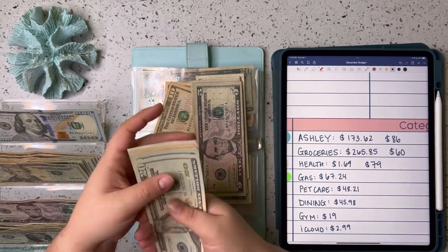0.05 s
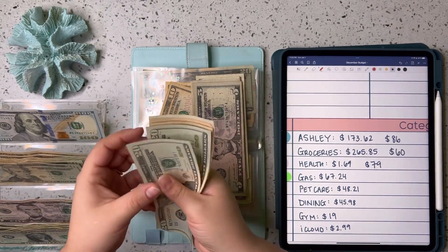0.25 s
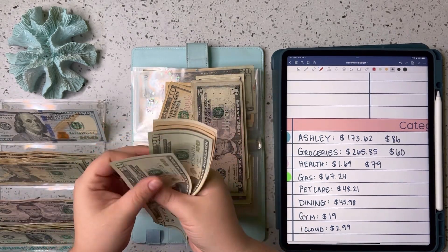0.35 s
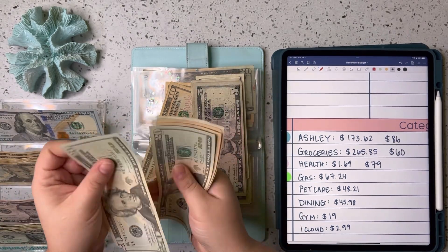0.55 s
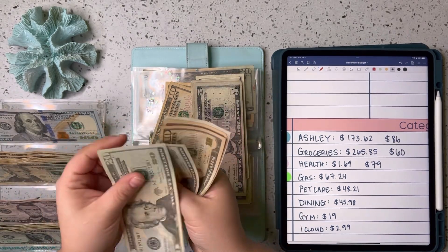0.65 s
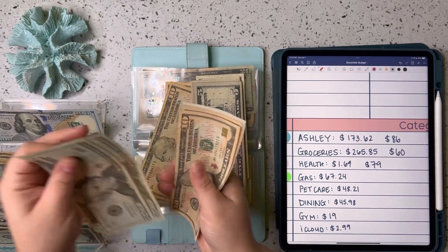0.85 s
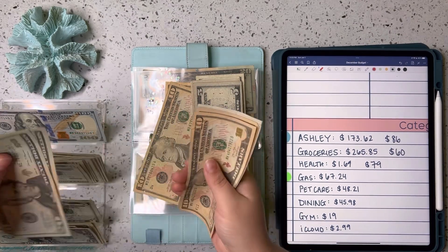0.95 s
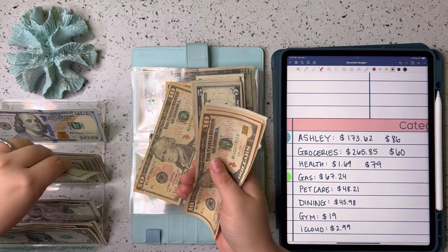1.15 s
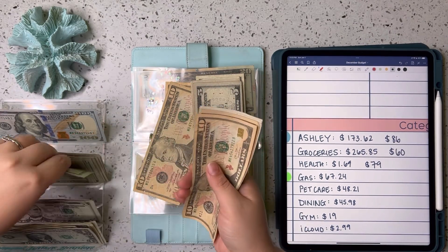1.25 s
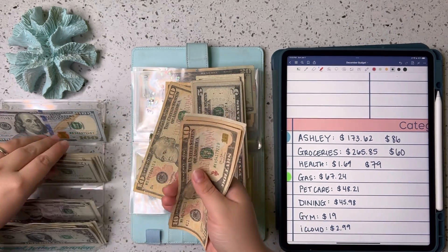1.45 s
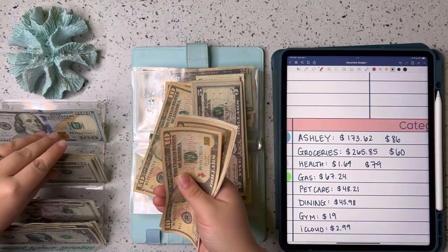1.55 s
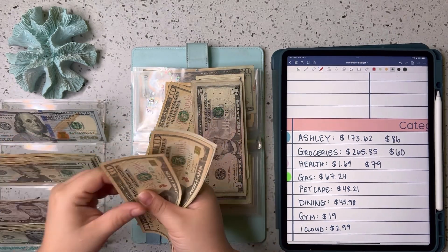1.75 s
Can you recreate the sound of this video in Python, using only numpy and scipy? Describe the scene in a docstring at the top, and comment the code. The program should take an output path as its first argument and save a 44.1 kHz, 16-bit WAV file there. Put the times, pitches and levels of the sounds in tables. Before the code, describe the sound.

Banknotes are counted by hand close to a phone microphone: grainy sliding, a sharp snap early, busy rustling, a louder flick before one second, then near silence and a soft rustle at the end.

```python
"""Paper notes are thumbed apart, flicked and laid down on a desk under a two-port phone microphone.
From the start paper slides on paper as a grainy hiss, made of noise and tiny clicks that ring in the sheets.
Flexing sheets and hands puff low air with small crumples, over a faint steady noise floor.
Creases soon snap as short ringing bursts, loudest near 0.23 s and 0.79 s, and a quiet room rings on.
From 0.38 s bending sheets also pop in short low tones; after 1 s it calms, then stirs again at the end."""
import sys
import numpy as np
from scipy import signal
from scipy.fft import rfft, irfft
from scipy.io import wavfile
from scipy.ndimage import uniform_filter1d

SR = 44100
rng = np.random.default_rng(int(sys.argv[2]) if len(sys.argv) > 2 else 0)


def invert_db(x):
    """Field ratio 10**(x/20) for x, a level in decibels (scalar or array-like)."""
    u = np.asarray(x, float) / 20
    return 10 ** u


def wav_out(sig):
    """Save sig, one row per channel (or a flat mono array), as 16-bit PCM at SR to the path in sys.argv[1]."""
    wavfile.write(sys.argv[1], SR, np.round(np.clip(np.atleast_2d(sig).T, -1, 1) * 32767).astype(np.int16))


N = 79380
HZ = np.fft.rfftfreq(N, 1 / SR) + 1  # kept above zero so that its logarithm exists

# how strongly sheets and hands flap: t/s, level from 160 to 1100 Hz/dB, bass above that level/dB
FLAP_CURVE = [(0, -57.5, -4.5), (0.1, -66.5, -6.5), (0.212, -82, 7), (0.235, -58, -12), (0.3, -71.5, 2),
              (0.4, -58.5, -17), (0.46, -52, -11.5), (0.5, -47, -13.5), (0.55, -55, -3.5),
              (0.6, -61.5, -14.5), (0.7, -59.5, -10), (0.75, -52.5, -17), (0.82, -50.5, -7),
              (0.86, -61, -12), (0.91, -54.5, -4), (0.96, -62.5, -12), (1.08, -80, -3), (1.18, -86.5, 6),
              (1.3, -89.5, 5.5), (1.7, -85.5, 4), (1.8, -68, -14)]
# tone colour of paper over the desk: f/Hz, level/dB
PAPER_COLOUR = [(700, -14), (1000, -3), (1400, -1.5), (2100, -4), (2900, 2.5), (4600, 1), (5900, -3),
                (7000, -0.5), (7600, -6), (9000, -3), (10300, -6), (12000, -2), (13600, -4), (15700, -10.5)]


def rms_one(x):
    """Scale each row to an average strength (rms) of 1."""
    return x / np.sqrt(np.mean(x ** 2, axis=-1, keepdims=True) + 1e-20)


def in_time(rows):
    """Read the columns of a time table at every sample, with straight lines between its rows."""
    s, *columns = np.transpose(rows)
    return [np.interp(np.arange(N) / SR, s, c) for c in columns]


def at_hz(points, hz):
    """Read a frequency table on a logarithmic pitch axis."""
    table_hz, values = np.transpose(points)
    return np.interp(np.log(hz), np.log(table_hz), values)


def drift(rate):
    """Random wandering of spread 1: noise smoothed twice so that little stays above rate (Hz)."""
    r = np.exp(-2 * np.pi * rate / SR)
    smooth = signal.lfilter([1], [1, -2 * r, r * r], rng.standard_normal(N + 8000))
    return rms_one(smooth[8000:])


def band(x, low, high):
    """Keep only the frequencies from low to high (Hz)."""
    return signal.sosfilt(signal.butter(3, [low, high], "band", fs=SR, output="sos"), x)


def colour(x, spectrum):
    """Raise and lower frequencies as a spectrum table says."""
    return irfft(rfft(x) * invert_db(at_hz(spectrum, HZ)), N)


def ring(x, hz, width):
    """A resonance at hz, width Hz wide: the narrower it is, the longer it rings."""
    r = np.exp(-np.pi * width / SR)
    return signal.lfilter([1, 0, -1], [1, -2 * r * np.cos(2 * np.pi * hz / SR), r * r], x)


def rub():
    """Fibres catch in dense small clicks over smooth friction noise; three ranges flicker and follow their levels."""
    # sliding paper: t/s, level from 3 to 8 kHz/dB, 0.7 to 3 kHz above that/dB, treble above that/dB
    rub_curve = [(0, -51.5, -5, -9), (0.1, -57.5, -0.5, -4), (0.16, -60, -3, -7.5), (0.195, -68.5, 2, -5),
                 (0.216, -57.5, 1, -9), (0.235, -35.5, -11, 2), (0.28, -42, -8, -9),
                 (0.34, -51.5, -6, -1.5), (0.39, -47.5, -0.5, -2.5), (0.415, -36.5, -6, -5),
                 (0.445, -36, -10.5, -6), (0.48, -51, 4.5, -9.5), (0.535, -49, -6.5, -3.5),
                 (0.565, -56.5, -2.5, -3.5), (0.62, -39, -16.5, -3.5), (0.67, -48, -6, -4.5),
                 (0.7, -45, -7.5, -10.5), (0.74, -54, 1, -6), (0.788, -42, -6.5, -7.5),
                 (0.808, -29, -18, -12.5), (0.83, -39.5, -6.5, -12.5), (0.88, -49, -4, -11.5),
                 (0.97, -54, -9.5, -4.5), (1.05, -64, -9, -5), (1.18, -74.5, -0.5, -6.5),
                 (1.235, -79.5, -0.5, -3.5), (1.258, -62.5, -7.5, -7), (1.34, -59, -8.5, -1),
                 (1.455, -70, 2, -5), (1.47, -65.5, -4, 3), (1.53, -59, -13.5, -7), (1.65, -50, -12.5, -9),
                 (1.8, -55.5, -7, -5.5)]
    grains_per_s, grain_spread_db, grain_db, flicker_db = 3100, 5, -7, 2
    level, low_db, treble_db = in_time(rub_curve)
    sizes = invert_db(grain_spread_db * np.minimum(rng.exponential(1, N), 5))
    caught = rng.random(N) < grains_per_s * invert_db(4 * drift(30)) / SR
    grains = rms_one(uniform_filter1d(sizes * caught, size=9))
    friction = rng.standard_normal((2, N)) * np.sqrt(1 + (invert_db(grain_db) * grains) ** 2)
    noise = sheet(colour(friction, PAPER_COLOUR))
    shared = drift(16.7)  # flicker common to all three ranges
    total = 0
    for low, high, db in [(700, 3000, low_db), (3000, 8000, 0), (8000, 16500, treble_db)]:
        flicker = flicker_db * (0.79 * shared + 0.61 * drift(65))
        total = total + invert_db(level + db + flicker) * rms_one(band(noise, low, high))
    return total


def sheet(x):
    """The sheets ring in narrow bands that swell and fade as they bend."""
    # ringing of the sheets: f/Hz, level/dB
    sheet_rings = [(1370, 2), (1720, 2), (2065, 10.5), (4450, -1), (5060, 2.5), (5850, 9.5)]
    width_hz, ring_db, sway_db = 122, -5.5, 3.5
    rung = sum(invert_db(db + sway_db * drift(11.0)) * ring(x, hz, width_hz) for hz, db in sheet_rings)
    return rms_one(x) + invert_db(ring_db) * rms_one(rung)


def flap():
    """Lumpy low noise from sheets flexing and hands moving."""
    # tone colour of the flapping: f/Hz, level/dB
    flap_colour = [(30, -23), (50, -5), (100, -2), (160, -5), (300, 1), (480, 3.5), (700, -2), (1000, -6)]
    flicker_db = 2.5
    level, bass_db = in_time(FLAP_CURVE)
    noise = colour(rng.standard_normal((2, N)), flap_colour)
    flexing = invert_db(level + flicker_db * drift(30)) * rms_one(band(noise, 160, 1100))
    bass = invert_db(level + bass_db + flicker_db * drift(10)) * rms_one(band(noise, 25, 160))
    return flexing + bass


def ticks():
    """Scattered small crumples, each a short ring between 700 and 3200 Hz, rise and fall with the flapping."""
    ticks_per_s, tick_db, spread_db = 200, -4.5, 6
    level, _ = in_time(FLAP_CURVE)
    sizes = invert_db(spread_db * np.minimum(rng.exponential(1, N), 3))
    clicks = (rng.random(N) < ticks_per_s / SR) * sizes
    # each click is dealt at random to one of six overlapping bands
    dealt, edges = rng.integers(0, 6, N), np.geomspace(700, 3200, 8)
    rung = sum(band(clicks * (dealt == k) + 1e-18, edges[k], edges[k + 2]) for k in range(6))
    return invert_db(level + tick_db) * rms_one(rung)


def noise_floor():
    """Faint steady noise, separate in the two views."""
    # tone colour of the floor: f/Hz, level/dB
    floor_colour = [(30, -23), (60, -2), (150, -11), (400, -20), (1200, -1), (15500, -39)]
    return invert_db(-83.5) * rms_one(colour(rng.standard_normal((2, N)), floor_colour))


def snaps():
    """Each crease bursts in crackle, part broad, part ringing, with a low push; the desk throws the crackle back."""
    # snapping creases: t/s, strength/dB, ring f/Hz, length/s, top of the crackle f/Hz
    snap_list = [(0.0153, -33, 2300, 0.0039, 3400), (0.067, -35.5, 1960, 0.0018, 2900),
                 (0.08, -37.5, 2100, 0.0018, 2970), (0.139, -35.5, 3000, 0.0027, 8000),
                 (0.2062, -37.5, 2230, 0.001, 5000), (0.2202, -19.5, 2090, 0.0017, 13970),
                 (0.2223, -28.5, 2340, 0.0059, 14360), (0.2283, -14.5, 5470, 0.0023, 14900),
                 (0.257, -27, 4900, 0.0023, 8160), (0.3685, -26.5, 1800, 0.0018, 5380),
                 (0.395, -29, 1500, 0.00083, 3000), (0.411, -24.5, 2200, 0.00146, 7040),
                 (0.442, -30.5, 4360, 0.0046, 7000), (0.466, -32, 2650, 0.0026, 3430),
                 (0.468, -31, 2185, 0.0021, 3200), (0.498, -40, 1200, 0.0015, 3000),
                 (0.54, -37.5, 1930, 0.0036, 3010), (0.794, -9, 1920, 0.0024, 14220),
                 (0.802, -25.5, 4340, 0.0026, 5200), (0.912, -39, 1946, 0.0047, 3500),
                 (1.3722, -41.5, 1390, 0.0046, 5530), (1.4118, -44.5, 1500, 0.0053, 5200),
                 (1.465, -52, 1410, 0.0057, 8000), (1.7257, -26.5, 3960, 0.0015, 6160),
                 (1.781, -46, 2400, 0.0074, 4500), (0.948, -47, 2000, 0.004, 6500)]
    ring_width_hz, broad_db, low_hz = 360, 1, 850
    tail_db, body_db = -17.5, -17.5  # after-crackle; low push of the sheet
    echo_s, echo_db = 0.0005, -6
    out, t = np.zeros((2, N + 2048)), np.arange(2048) / SR
    for s, db, hz, length, top_hz in snap_list:
        u = t / max(length, 5e-4)
        swell = np.sqrt(u) * (np.exp(-u ** 2) + invert_db(tail_db) * np.exp(-u / 2))
        burst = rng.standard_normal((2, 2048)) * swell
        broad = rms_one(band(burst, low_hz, min(top_hz, 0.45 * SR)))
        both = rms_one(ring(burst, hz, ring_width_hz)) + invert_db(broad_db) * broad
        # a longer snap gets more energy, so that its strength stays alike
        scale = np.sqrt(length * SR / 2048) / 2
        i = int(s * SR)
        out[:, i:i + 2048] += invert_db(db) * both / np.std(both, 1, keepdims=True) * scale
    echo = invert_db(echo_db) * np.roll(out, int(echo_s * SR), axis=1)
    # keeping only the upward swings leaves a slow bulge: the push of the sheet
    body = band(np.abs(out) + out, 350, 1500)
    return colour((out + echo)[:, :N], PAPER_COLOUR) + invert_db(body_db) * body[:, :N]


def room(x):
    """Dense reflections, built octave by octave from fading noise, die faster in the treble."""
    # time to fade by 60 dB: f/Hz, time/s
    fade_times = [(500, 0.39), (14000, 0.31)]
    room_db = -21
    t, tail = np.arange(SR) / SR, 0
    for low in 100 * 2.0 ** np.arange(8):
        octave = band(rng.standard_normal((2, SR)), low, min(2 * low, 17000))
        tail = tail + octave * invert_db(-60 * t / at_hz(fade_times, low))
    tail = tail * np.clip(t / 0.0018 - 1, 0, 1)  # silent for 1.8 ms, full at 3.6 ms
    tail = tail / np.sqrt(np.sum(tail ** 2) / 2)
    return invert_db(room_db) * signal.fftconvolve(x, tail, axes=1)[:, :N]


def pops():
    """A sheet pops as it bends over: a few cycles of low tone, swelling and dying."""
    # popping sheets: t/s, level (4 dB above the peak)/dB, f/Hz
    pop_list = [(0.383, -42, 440), (0.454, -38, 368), (0.469, -40, 467), (0.748, -33.5, 500),
                (0.915, -47, 486), (1.158, -64.5, 550), (1.176, -63, 620), (1.722, -57.5, 590)]
    cycles = 5.2  # four times the swelling time
    out, t = np.zeros(N + 4096), np.arange(4096) / SR
    for s, db, hz in pop_list:
        u = t * hz / cycles * 4
        i = int(s * SR)
        out[i:i + 4096] += invert_db(db - 4.0) * u * np.exp(1 - u) * np.sin(2 * np.pi * hz * t)
    return out[:N]


def scene():
    """Two views of the same events, with snaps, pops and ticks weaker in the second; the ports mix them."""
    struck = snaps() * [[1], [0.6]] + (pops() + ticks()) * [[1], [0.3]]
    return rub() + flap() + struck + room(struck) + noise_floor()


def top_cut(x):
    """Nothing passes above the cut-off."""
    return signal.sosfilt(signal.butter(12, 16970, fs=SR, output="sos"), x)


def record(dry):
    """Two ports share the sound by frequency; in the treble their phases turn against each other."""
    # likeness of the two ports: f/Hz, likeness/0-1
    likeness = [(60, 0.87), (300, 0.92), (700, 0.46), (1050, 0.2), (2100, 0.79), (3100, 0.02), (4100, 0.05),
                (5000, 0.16), (5900, 0.22), (7900, 0), (8800, 0.99)]
    # balance of the ports: f/Hz, left over right/dB
    balance = [(300, 0.5), (2400, -1), (3800, -1.2), (5500, -4), (8400, 0.5)]
    cutoff_hz, in_step_hz, turn_hz = 15900, 11900, 4900
    linger = 0.55  # how much the turning lingers where the ports are in step or opposed
    one, other = rfft(dry)
    alike = np.clip(at_hz(likeness, HZ), 0, 1)
    tilt = invert_db(at_hz(balance, HZ) / 2)
    # one full turn between the ports per turn_hz, starting at 7 kHz
    phase = 2 * np.pi * np.maximum((HZ - in_step_hz) / turn_hz, -1)
    turn = np.exp(0.5j * (phase - linger * np.sin(2 * phase)))
    mid = np.sqrt((1 + alike) / 2) * one
    side = np.sqrt((1 - alike) / 2) * other
    left, right = (mid + side) * tilt * turn, (mid - side) / tilt / turn
    ports = irfft(np.array([left, right]) * (HZ < cutoff_hz), N)
    return top_cut(ports)


dry = scene()
out = record(dry)
wav_out(out)
```